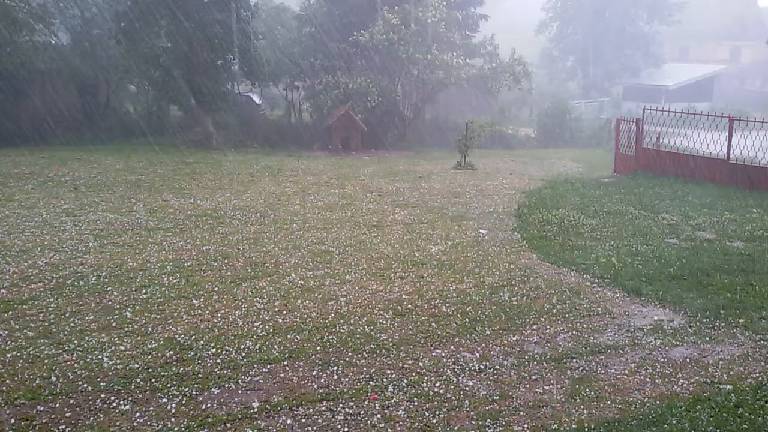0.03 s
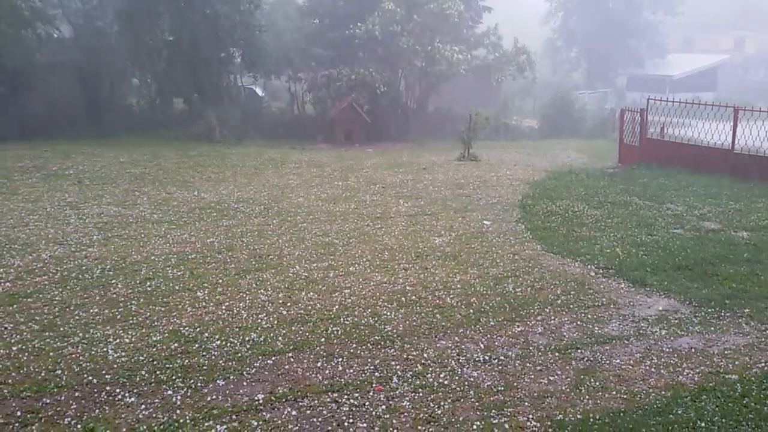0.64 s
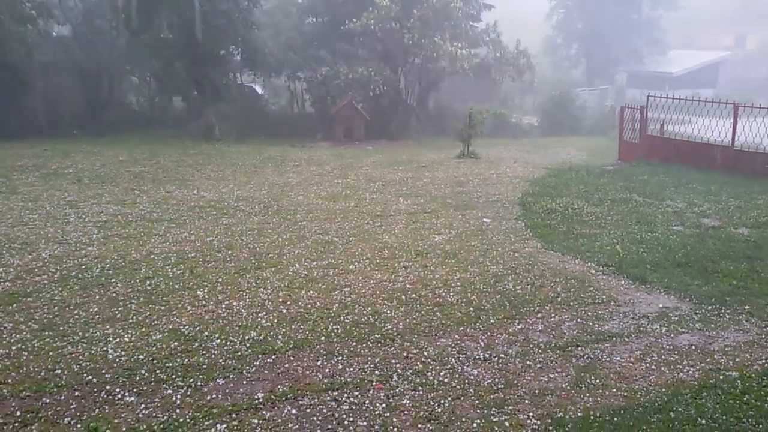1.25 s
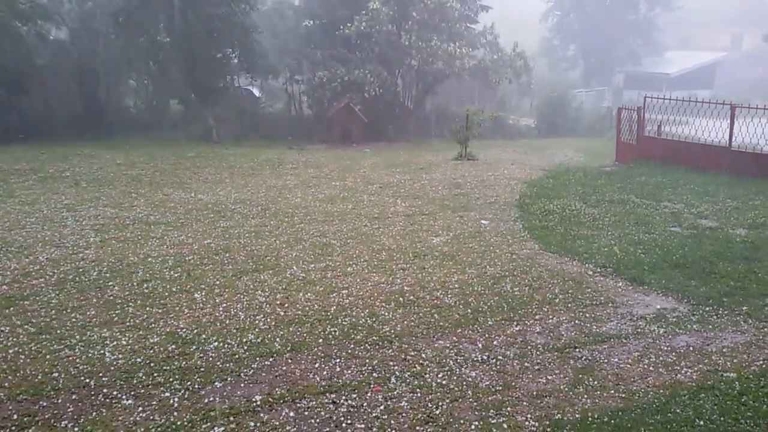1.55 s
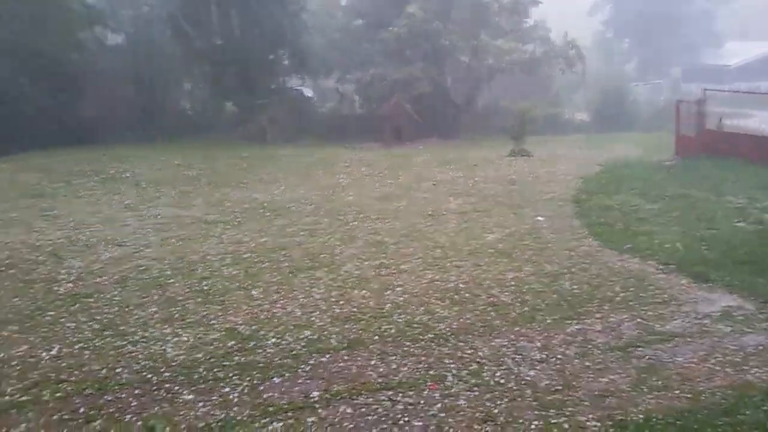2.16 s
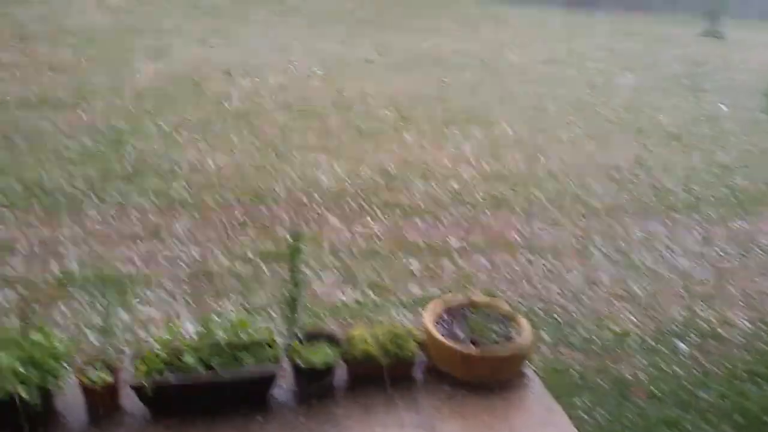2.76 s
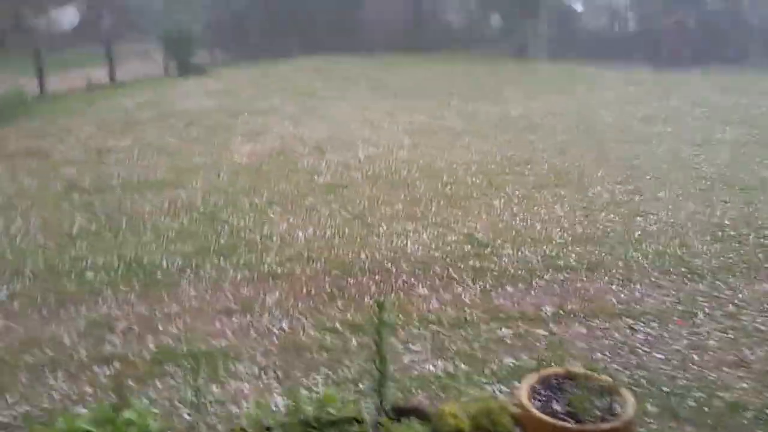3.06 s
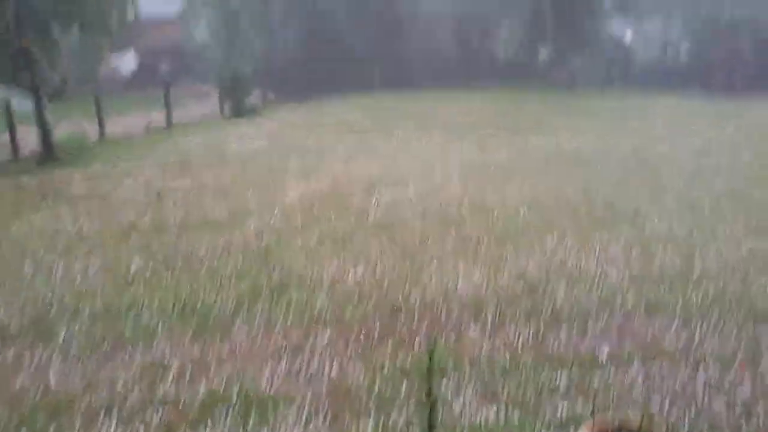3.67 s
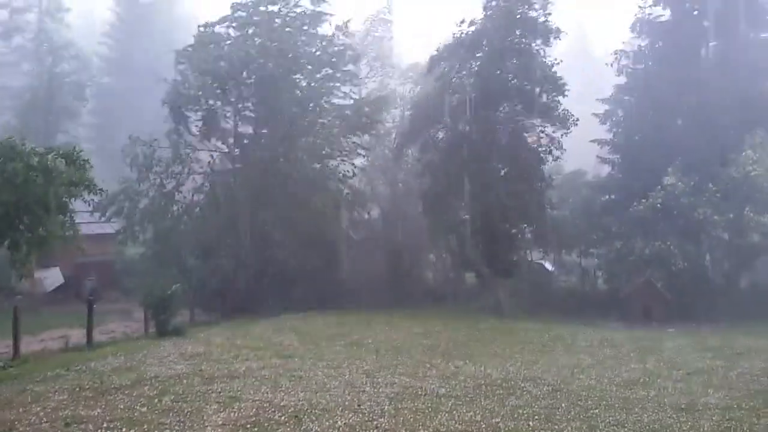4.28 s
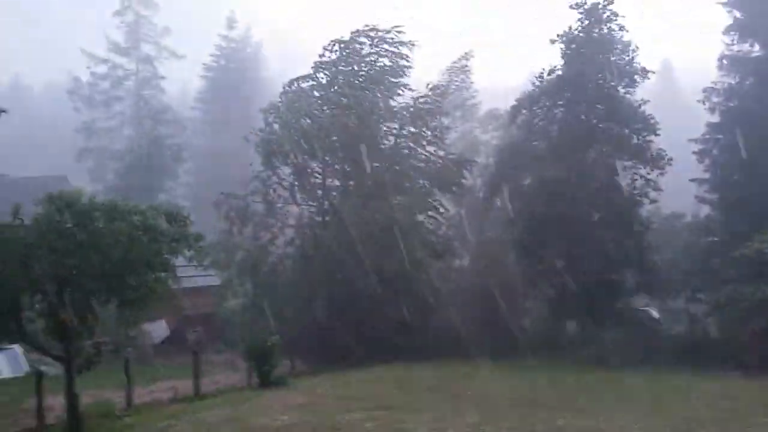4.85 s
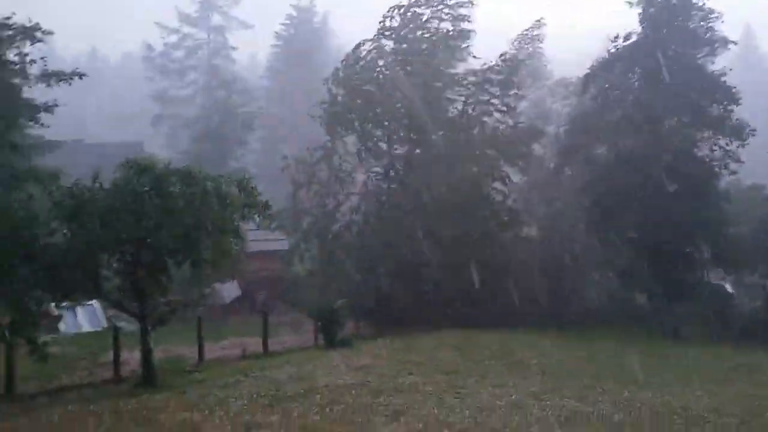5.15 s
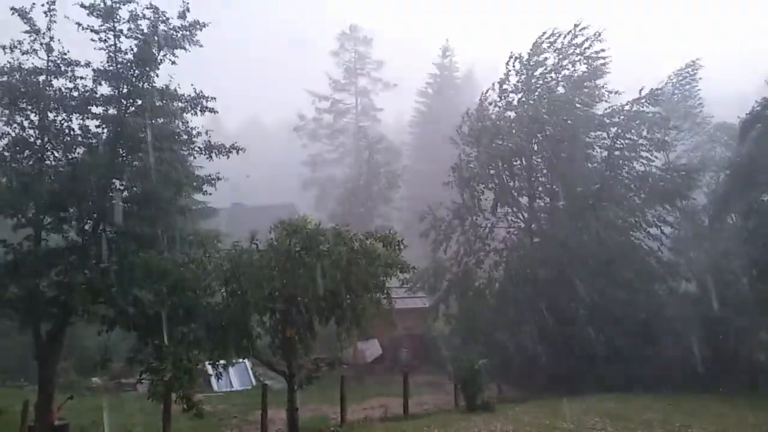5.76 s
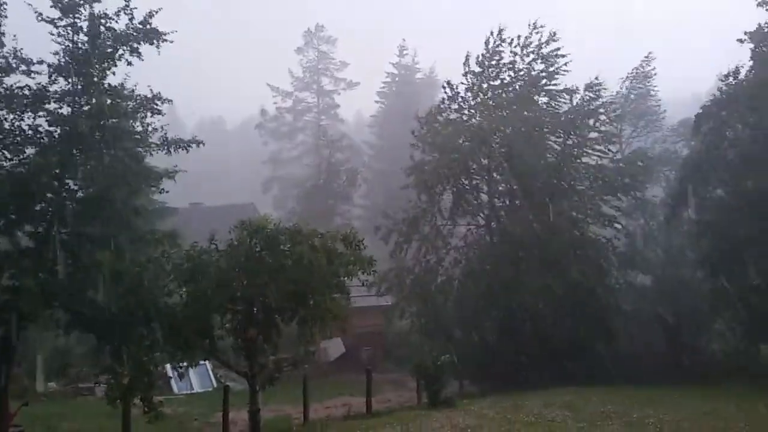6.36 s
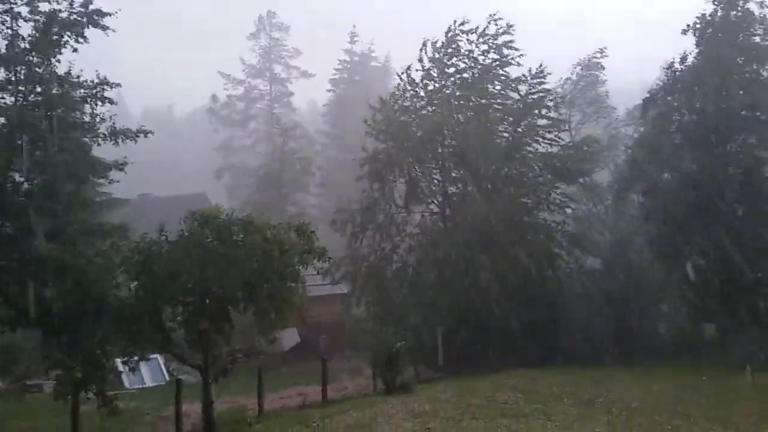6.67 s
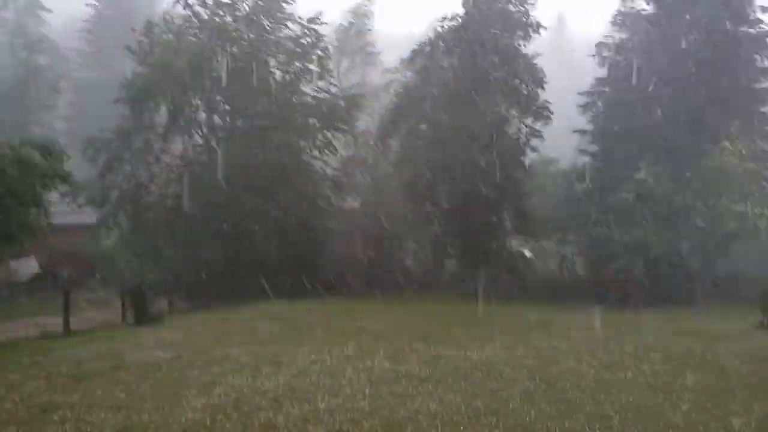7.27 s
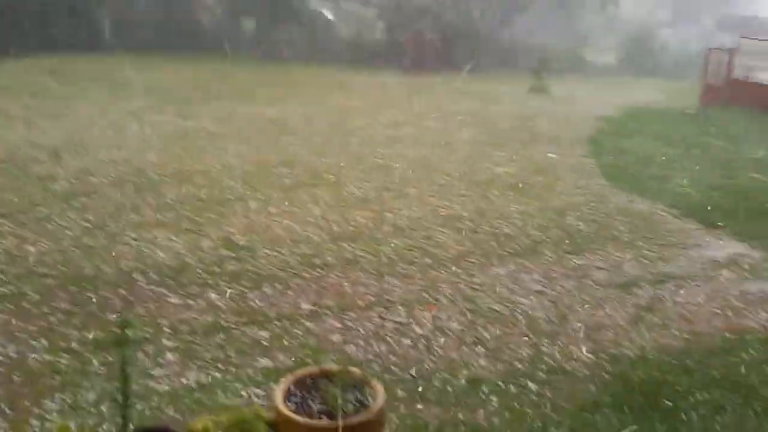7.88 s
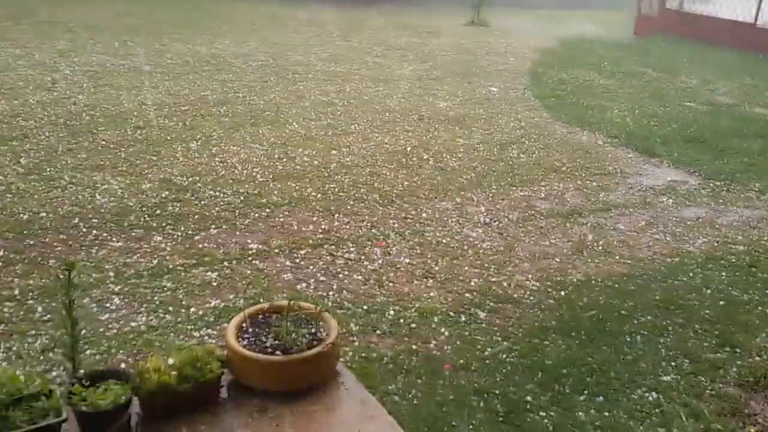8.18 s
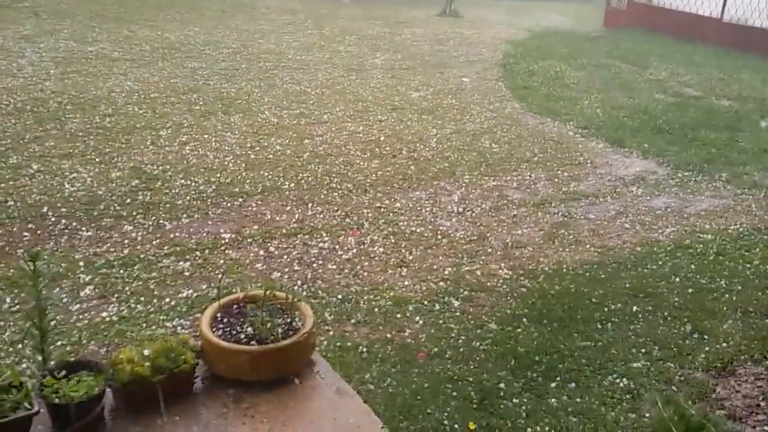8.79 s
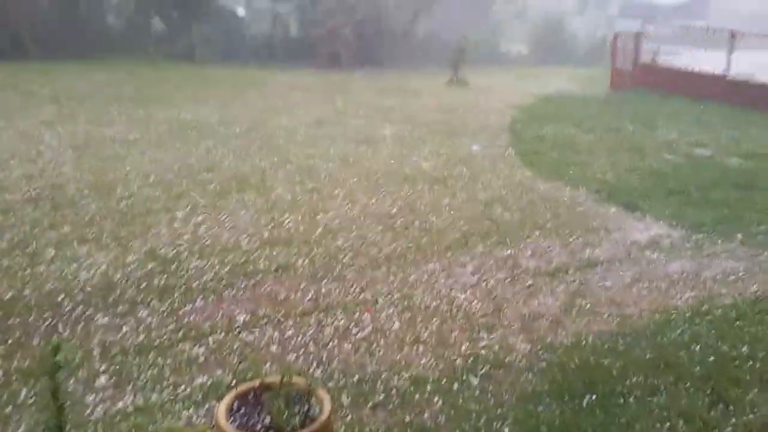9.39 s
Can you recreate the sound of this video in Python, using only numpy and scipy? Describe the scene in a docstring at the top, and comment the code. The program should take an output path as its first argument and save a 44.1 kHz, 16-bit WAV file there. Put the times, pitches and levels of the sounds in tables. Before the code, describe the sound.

A dense, hissing hailstorm pelts a garden, single stones clicking and rattling on clay pots while wind rumbles faintly underneath.

```python
"""Hailstorm from beside a house wall

Heavy hail and rain beat on a lawn and on wind-tossed trees, in mono. Countless stones merge into a
roar; nearer ones patter, ping on hard things and rattle on clay pots, and a few crack close by or
thud on hollow things. The wall's reflection combs the roar as the microphone moves. Underneath,
wind drums stones on the house and now and then rumbles on the microphone."""
import sys
import numpy as np
from scipy import signal
from scipy.fft import rfft, irfft, next_fast_len
from scipy.io import wavfile
from scipy.ndimage import uniform_filter1d, minimum_filter1d

SR = 44100
rng = np.random.default_rng(int(sys.argv[2]) if len(sys.argv) > 2 else 0)


def log_audio(samples):
    """Write samples as a 16-bit WAV file to the path given in sys.argv[1]."""
    # one column per channel
    frames = np.atleast_2d(samples).T
    # limit to full scale, then quantise
    limited = np.clip(frames, -1, 1)
    pcm = np.round(limited * 32767).astype(np.int16)
    wavfile.write(sys.argv[1], SR, pcm)


N = 420273

# strength of the downpour, riding the roar and the wash: t/s, level/dB
STORM_CURVE = [(1.15, -18.5), (1.3, -20), (2.0, -20), (2.25, -18), (2.8, -18.5), (3.1, -16.5), (3.5, -17),
               (3.65, -15), (4.26, -15), (4.31, -14.5), (4.35, -15.5), (5.05, -16), (5.3, -14.5),
               (6.0, -16), (6.95, -14), (7.65, -15.5), (8.3, -14), (9.2, -13), (9.53, -14)]
# the microphone leans out from its shelter: t/s, share of the open roar/0-1
OPENNESS_CURVE = [(0.5, 0), (2.1, 0.04), (3.2, 0.24)]
# fader of the treble sizzle: t/s, level/dB
SIZZLE_CURVE = [(1.1, -24.5), (1.5, -28), (2.0, -26.5), (2.4, -24.5), (4.15, -24), (4.4, -27), (4.9, -28),
                (5.4, -26), (6.5, -23), (7.1, -26), (8.4, -24.5), (9.5, -24)]
# hiss of hail on the lawn: f/Hz, level/dB
LAWN_EQ = [(700, -17.5), (1300, -13.5), (2000, -4.5), (2700, -0.5), (3700, 0), (4080, 0.5), (4600, 2),
           (5400, -1), (6000, -2), (7000, -5), (8000, -16), (11000, -33)]
# open roar of the trees: f/Hz, level/dB
ROAR_EQ = [(500, -16), (1100, -12.5), (1700, -0.5), (2400, 1.5), (3100, 0), (3650, 1), (3980, -15),
           (4600, -5), (5450, -26), (6800, -12.5), (8000, -3), (10000, -11.5), (14000, -70)]
# lower wash of the trees: f/Hz, level/dB
WASH_EQ = [(200, -23), (420, -6), (620, -1.5), (820, -2), (1100, 0), (1450, -2), (1900, -3.5), (3000, -32),
           (6000, -41)]
# sizzle on top: f/Hz, level/dB
SIZZLE_EQ = [(4000, -6), (6500, 0), (7700, 1.5), (8800, -3), (10000, -3.5), (11500, -7), (12700, -14),
             (14500, -47)]
# resonances of the things that the stones pelt: f/Hz, width/Hz, level/dB
PELTED_MODES = [(614, 25, -15.5), (1110, 83, -7), (1444, 81, -8.5), (1810, 98, -6.5), (2127, 73, 0.5),
                (2530, 160, -15), (2880, 140, 2.5), (3030, 100, -4.5), (3362, 81, 2), (3715, 52, 1.5),
                (7150, 283, -6), (7800, 330, -13)]
# resonances of clay pots on the terrace: f/Hz, width/Hz, level/dB
POT_MODES = [(1756, 160, -8.5), (3050, 65, -7), (4590, 200, -2), (4730, 250, -6.5), (4930, 240, -3),
             (7400, 330, -11)]
# large stones that crack close by: t/s, level/dB, f/Hz, t60/s
CRACK_HITS = [(0.8435, -8, 4200, .008), (0.8445, -6, 2900, 0.011), (0.848, -3.5, 3300, 0.0071),
              (0.873, -6, 4500, .014), (0.96, -5, 6700, .008), (0.963, -8, 2700, .012),
              (1.141, -10, 7700, .009), (1.2043, 2, 5700, 0.0093), (1.2052, -1, 3900, .009),
              (1.284, -8, 5870, .014), (1.328, -11, 8100, .012), (1.449, -5, 4300, .012),
              (1.45, -14, 1650, 0.033), (1.517, -11, 6000, .018), (1.5325, -2, 4800, 0.0065),
              (1.9292, -1.5, 3100, 0.011), (1.9325, -1, 3430, .009), (2.363, 1, 4100, 0.006),
              (2.531, -1, 6900, 0.0032), (4.3575, 4, 3370, 0.0037), (4.683, -2, 6200, 0.0093),
              (5.289, 1, 4740, .013), (5.364, -8, 4080, .012), (6.593, -4, 7500, .009),
              (6.685, -5, 7300, .01), (7.447, -9, 3390, .006), (7.649, -4, 5700, .006),
              (7.965, -2.5, 3760, 0.0055), (8.551, -4.5, 1900, 0.036), (8.629, -4, 7100, .007),
              (8.691, -5.5, 6500, .007), (8.911, -4, 2020, 0.037), (9.083, 1, 2880, 0.015),
              (9.361, -5, 6400, 0.012)]
# stones on hollow things: t/s, level/dB, f/Hz, t60/s, relative knock level/dB, knock f/Hz
THUD_HITS = [(1.449, -9.5, 215, 0.12, -6.5, 1110), (1.936, -14, 193, 0.18, -15, 700),
             (1.967, -16, 194, 0.19, -16, 700), (1.997, -15.5, 192, 0.21, -13, 700),
             (2.057, -11, 182, 0.15, -13, 706), (2.734, -12, 222, 0.12, -8, 785),
             (2.947, -9.5, 242, 0.16, -5.5, 810), (7.709, -14.5, 330, 0.14, -7, 710),
             (8.253, -15, 222, 0.065, -4, 700), (8.492, -15, 335, 0.046, -2, 700),
             (8.726, -9, 146, 0.1, -10, 700), (8.722, -6.5, 600, 0.07, -18, 890),
             (8.9, -10, 386, 0.086, -10, 700), (8.981, -14, 160, .06, -8, 700),
             (9.127, -10, 202, .06, -13, 700), (9.376, -14, 445, 0.12, -7, 694)]
# partials of a hollow thing: f/multiple of its pitch, level/dB, decay/share of its t60
HOLLOW_MODES = [(1, -2.5, 0.73), (2.0, -15, 0.99), (2.4, -12, 0.54), (2.9, -8, 0.17)]
# stones that ping on hard things: t/s, level/dB, f/Hz
PING_HITS = [(0.689, -22, 1095), (1.082, -17, 3700), (3.234, -18, 7000), (3.318, -21, 7400),
             (3.835, -15, 4880), (3.977, -16, 2930), (4.097, -11.5, 3050), (4.122, -20, 6600),
             (5.162, -13.5, 2160), (5.333, -11.5, 4800), (6.265, -20, 2710), (6.659, -17, 3920),
             (7.235, -14, 1950), (8.403, -9.5, 4785), (8.765, -14, 4760), (8.96, -19, 1790)]
# spells in which one thing is pelted harder: t/s, half width/s, f/Hz, level/dB
PELTING_SPELLS = [(2.45, 0.48, 1770, -34), (3.6, .45, 2480, -34), (4.5, 0.34, 3410, -28.5),
                  (5.65, .35, 2560, -32), (7.0, .4, 613, -35.5), (8.9, .45, 4720, -35)]
# reflection from the wall: t/s, delay/ms, strength/0-1
WALL_REFLECTION = [(0.5, 0.81, 0.27), (2.25, 0.88, 0.25), (2.7, 1.1, 0.8), (3.15, 1.29, 0.36),
                   (4.1, 1.26, 0.53), (4.8, 1.4, 0.37), (5.6, 1.57, 0.4), (6.2, 1.4, 0.4),
                   (7.0, 1.54, 0.15), (7.6, 1.3, 0.4), (8.0, 1.24, .45), (8.6, 1.14, 0.5), (9.5, 1.17, 0.4)]
# wind against its usual strength: t/s, level/dB
BREEZE_CURVE = [(1.3, 0), (1.5, -13), (1.85, -17), (2.0, -4), (3.05, 1.5), (3.3, -13), (3.74, -7),
                (3.84, -2), (4.3, 3), (4.95, -0.5), (6.2, 0), (7.05, 1), (7.5, 0), (7.63, -6), (7.8, -15),
                (7.86, -5), (8.3, 6), (9.5, 6)]
# gusts that buffet the microphone: t/s, level/dB
GUST_CUES = [(1.03, -32), (1.31, -35), (5.93, -32), (8.11, -36), (8.34, -35), (8.61, -30), (8.76, -31),
             (8.98, -30), (9.23, -36)]
# stones drumming on the house: f/Hz, level/dB
DRUMMING_EQ = [(55, -34), (85, -8), (118, -6), (138, 1), (165, -2), (210, 2), (255, 0.5), (305, -4),
               (420, -2.5), (600, -5), (1200, -52)]
# wind on the microphone: f/Hz, level/dB
WIND_EQ = [(15, -34), (30, -22), (50, -12), (66, -5), (100, -1.5), (150, -10), (300, -13)]
# the level dips briefly: t/s, depth/dB, half width/s
LEVEL_DIPS = [(1.22, 6.5, 0.013), (4.349, 6.5, 0.013)]

FULL_STORM_DB = -15  # reference point on the storm curve
LN_1000 = np.log(1000)  # a decay of 60 dB


def downpour():
    """The main bed: the lawn's hiss opens toward the trees' roar, with pelted things ringing in it."""
    storm_db, sizzle_db = automation(STORM_CURVE) + automation(SIZZLE_CURVE)
    openness, = automation(OPENNESS_CURVE)
    turn = ramp(7.03, 9.14)  # the microphone turns from the trees down to the terrace
    wash_db = -24.5 + (storm_db - FULL_STORM_DB) - 7 * turn
    things_gain = from_db(-11 + 5 * openness + 6.5 * turn)
    pots_gain = from_db(-10 + 9 * turn)

    patter = ticks(impacts(per_s=2600, spread_db=2.5), cycles=18)
    stones = impacts(per_s=240, spread_db=2)  # the same stones splash in every register
    strays = stray_pings(per_s=300, spread_db=1.5, low_hz=450, high_hz=8242, t60=0.13)
    fall = hailfall(patter, splash(stones, t60=0.041), tick_db=-7, splash_db=-4.5)
    fall += from_db(-12) * strays
    roar = np.sqrt(1 - openness) * eq(fall, LAWN_EQ) + np.sqrt(openness) * eq(fall, ROAR_EQ)
    wash = hailfall(patter, splash(stones, t60=0.075), tick_db=-5, splash_db=-4)
    wash = eq(wash + from_db(-9) * strays, WASH_EQ)
    sizzle = eq(hailfall(patter, splash(stones, t60=0.16), tick_db=-32, splash_db=2), SIZZLE_EQ)

    things = things_gain * pelted_things(PELTED_MODES, ping_db=0.5, pings_per_s=20, ping_t60=0.13)
    pots = pots_gain * pelted_things(POT_MODES, ping_db=5, pings_per_s=70, ping_t60=0.034)
    # the ringing takes a share of the roar's power
    roar = (roar + things + pots) / np.sqrt(1 + things_gain ** 2 + pots_gain ** 2)
    return from_db(storm_db - 1.39) * roar + from_db(wash_db) * wash + from_db(sizzle_db) * sizzle


def hailfall(patter, splashes, tick_db, splash_db):
    """Far stones blur to a smooth rush; the nearer ticks and splashes poke through."""
    return rng.standard_normal(N) + from_db(tick_db) * patter + from_db(splash_db) * splashes


def impacts(per_s, spread_db):
    """Stones land as random clicks: many small or far, few large or near."""
    chance, size = rng.random((2, N))
    at, clicks = np.flatnonzero(chance < per_s / SR), np.zeros(N)
    strength = np.minimum(-np.log(1 - size[at]), 5)
    clicks[at] = from_db(spread_db * strength) * (-1) ** (at % 2)
    return clicks


def ticks(clicks, cycles, count=20):
    """Each stone ticks at one of many pitches, dying away over so many cycles; rms 1."""
    dealt = rng.integers(0, count, N)
    pitches_hz = np.geomspace(600, 13000, count)
    return rms_one(sum(hz * ring(clicks * (dealt == k), hz, cycles / hz)
                       for k, hz in enumerate(pitches_hz)))


def splash(clicks, t60):
    """Each impact scatters ice and water in a short burst of noise; rms 1."""
    pole = np.exp(-2 * LN_1000 / (t60 * SR))
    power = signal.lfilter([1], [1, -pole], clicks ** 2 + 1e-18)
    return rms_one(np.sqrt(power) * rng.standard_normal(N))


def stray_pings(per_s, spread_db, low_hz, high_hz, t60):
    """Stones hit branches, tiles and railings all around, each ringing at a pitch of its own; rms 1."""
    clicks, t = impacts(per_s, spread_db), np.arange(SR // 8) / SR
    hz = low_hz * (high_hz / low_hz) ** rng.random(N)
    tail, out = decay(t, t60), np.zeros(N + len(t))
    for at in np.flatnonzero(clicks):
        out[at:at + len(t)] += clicks[at] * np.sqrt(hz[at]) * np.sin(2 * np.pi * hz[at] * t) * tail
    return rms_one(out[:N])


def pelted_things(modes, ping_db, pings_per_s, ping_t60):
    """Each thing hums under the dense fall and pings under single stones; rms 1."""
    out = np.zeros(N)
    for hz, width_hz, db in modes:
        hum = resonance(impacts(per_s=900, spread_db=1.5), hz, width_hz)
        out += from_db(db) * (hum + from_db(ping_db) * pings(hz, width_hz, pings_per_s, ping_t60))
    return rms_one(out)


def pings(hz, width_hz, per_s, t60, count=7):
    """Each stone rings one note out of a cluster around a pitch; rms 1."""
    clicks, dealt = impacts(per_s, spread_db=2), rng.integers(0, count, N)
    notes = hz + width_hz * np.linspace(-0.5, 0.5, count)
    return rms_one(sum(ring(clicks * (dealt == k), note, t60) for k, note in enumerate(notes)))


def cracks(spray_ratio=1.29):
    """A close stone gives a bright snap, a short hard note and a spray of fragments around its pitch."""
    out, t = np.zeros(N + SR), np.arange(SR // 20) / SR
    for s, db, hz, t60 in list(CRACK_HITS) + small_stones():
        tail = decay(t, t60)
        spray_noise, snap_noise = rng.standard_normal((2, len(t)))
        fragments = rms_one(bandpass(spray_noise, hz / spray_ratio, min(hz * spray_ratio, 0.45 * SR)))
        spray = 0.35 * fragments * np.sqrt(tail)
        snap = 0.2 * snap_noise * decay(t, t60=0.0044)
        note = 0.6 * np.sin(2 * np.pi * hz * t) * tail
        at = round(s * SR)
        out[at:at + len(t)] += from_db(db) * (snap + note + spray)
    return bandpass(out[:N], 500, 10000)  # ice is too small to give bass


def small_stones(per_s=6.2, centre_hz=6660, spread_octaves=0.185, t60=0.0056):
    """Smaller stones click at random, high and short, louder as the storm grows; rows as CRACK_HITS."""
    onsets = np.flatnonzero(rng.random(N) < per_s / SR)
    size, pitch = rng.standard_normal((2, N))
    storm_db, = automation(STORM_CURVE)
    db = -7.5 + 0.36 * (storm_db - FULL_STORM_DB) + 2.5 * size
    return [(at / SR, db[at], centre_hz * 2 ** (spread_octaves * pitch[at]), t60) for at in onsets]


def thuds(attack_s=0.0051):
    """A large stone on a hollow thing: a quick, rattly knock over a longer low note; no deep bass."""
    out = np.zeros(N)
    rattle = 0.75 * rms_one(bandpass(rng.standard_normal(N), 450, 1400))
    for s, db, hz, t60, knock_db, knock_hz in THUD_HITS:
        at = round(s * SR)
        t = np.arange(min(SR // 2, N - at)) / SR
        knock = np.sin(2 * np.pi * knock_hz * t) + rattle[at:at + len(t)]
        hit = from_db(knock_db) * knock * decay(t, t60=0.056)
        attack = 1 - np.exp(-t / attack_s)
        for multiple, mode_db, share in HOLLOW_MODES:
            partial = np.sin(2 * np.pi * hz * multiple * t)
            hit += from_db(mode_db) * attack * partial * decay(t, t60 * share)
        out[at:at + len(t)] += from_db(db) * hit
    return low_cut(out, hz=130, order=4)


def loud_pings():
    """A large stone strikes something hard squarely and one clear note rings out."""
    out = np.zeros(N)
    for s, db, hz in PING_HITS:
        click = np.zeros(N)
        click[round(s * SR)] = from_db(db)
        out += ring(click, hz, t60=0.097)
    return out


def pelting_spells(width_hz=60):
    """The wind drives the stones onto one thing for a while, so that its ring swells and fades."""
    out = np.zeros(N)
    for s, half_width_s, hz, db in PELTING_SPELLS:
        ringing = pelted_things([(hz, width_hz, 0)], ping_db=4, pings_per_s=60, ping_t60=0.095)
        out += from_db(db) * swell(s, half_width_s) * ringing
    return out


def off_the_wall(x, second_bounce=0.09):
    """The wall adds dull, slightly late copies; their comb of peaks slides as the microphone moves."""
    delay_ms, strength = automation(WALL_REFLECTION)
    wall_band = signal.butter(1, [250, 1360], "band", fs=SR, output="sos")
    dull = signal.sosfiltfilt(wall_band, x)  # zero phase, so the delay alone tunes the comb
    n, lag = np.arange(N), delay_ms * SR / 1000
    late = np.interp(n - lag, n, dull) + second_bounce * np.interp(n - 2 * lag, n, dull)
    return x + strength * late


def wind_rumble():
    """The low end: wind drums stones on the house and on hollow things, and buffets the microphone."""
    breeze_db, = automation(BREEZE_CURVE)
    drumming = eq(splash(impacts(per_s=480, spread_db=0.35), t60=0.051), DRUMMING_EQ)
    buffeting = eq(splash(impacts(per_s=26, spread_db=1.5), t60=0.14), WIND_EQ)
    hollow_hum = from_db(-5.5) * low_cut(pings(hz=440.2, width_hz=516, per_s=32, t60=0.2, count=11))
    gust_gain = sum(from_db(db) * swell(s, half_width_s=0.049) for s, db in GUST_CUES)
    gusts = gust_gain * eq(rng.standard_normal(N), WIND_EQ)
    driven_stones = from_db(-32.5 + 0.2 * breeze_db) * (drumming + hollow_hum)
    return driven_stones + from_db(-43.5 + breeze_db) * buffeting + gusts


def ring(clicks, hz, t60):
    """A unit click sets a sine of height 1 ringing."""
    r, w = np.exp(-LN_1000 / (t60 * SR)), 2 * np.pi * min(hz, 0.45 * SR) / SR
    return signal.lfilter([0, np.sin(w)], [1, -2 * r * np.cos(w), r * r], clicks + 1e-18)


def resonance(x, hz, width_hz):
    """A resonant band, passed twice for steep skirts; rms 1."""
    r = np.exp(-np.pi * width_hz / np.sqrt(np.sqrt(2) - 1) / SR)
    section = [1 - r, 0, r - 1, 1, -2 * r * np.cos(2 * np.pi * hz / SR), r * r]
    return rms_one(signal.sosfilt([section, section], x + 1e-18))


def eq(x, curve):
    """Colour a sound with an EQ curve; rms 1."""
    hz, db = np.transpose(curve)
    size = next_fast_len(N, real=True)
    bins_hz = np.maximum(np.arange(size // 2 + 1) * SR / size, 1)
    gain_db = np.interp(np.log(bins_hz), np.log(hz), db, left=-90, right=-90)
    return rms_one(irfft(rfft(x, size) * from_db(gain_db), size)[:N])


def bandpass(x, low_hz, high_hz):
    """Roll off both lows and highs."""
    return signal.sosfilt(signal.butter(2, [low_hz, high_hz], "band", fs=SR, output="sos"), x)


def low_cut(x, hz=140, order=3):
    """Small ringing things give off no deep bass."""
    return signal.sosfilt(signal.butter(order, hz, "high", fs=SR, output="sos"), x)


def automation(rows):
    """Join timed breakpoints into one lane per column, a value per sample."""
    s, *columns = np.transpose(rows)
    return [np.interp(np.arange(N) / SR, s, column) for column in columns]


def decay(t, t60):
    """A tail that falls 60 dB in t60 seconds."""
    return np.exp(-LN_1000 * t / t60)


def ramp(start_s, end_s):
    """A linear fade from 0 to 1."""
    return np.clip((np.arange(N) / SR - start_s) / (end_s - start_s), 0, 1)


def swell(s, half_width_s):
    """A bell-shaped rise to 1 and fall around a time."""
    return np.exp(-((np.arange(N) / SR - s) / half_width_s) ** 2)


def from_db(db):
    """Decibels to gain."""
    return 10 ** (np.asarray(db) / 20)


def rms_one(x):
    """Scale to an rms of 1."""
    return x / np.sqrt(np.mean(x ** 2) + 1e-20)


def scene():
    """The mix: everything reaches one microphone, alike in both channels."""
    hail = low_cut(downpour() + pelting_spells() + loud_pings())
    mono = off_the_wall(hail) + wind_rumble() + thuds() + cracks()
    return np.stack([mono, mono])


def record(dry, ceiling=0.95, high_cut_hz=15200):
    """The master: a fade-in, two brief dips, a fast limiter on the peaks and a steep high cut."""
    dip_db = sum(depth * swell(s, half_width_s) for s, depth, half_width_s in LEVEL_DIPS)
    faded = dry * ramp(0.41, 0.68) * from_db(-dip_db)
    needed_gain = ceiling / np.maximum(np.abs(faded), ceiling)
    limiter_gain = uniform_filter1d(minimum_filter1d(needed_gain, size=33), size=33)
    return signal.sosfilt(signal.cheby2(16, 70, high_cut_hz, fs=SR, output="sos"), faded * limiter_gain)


dry = scene()
out = record(dry)
log_audio(out)
```